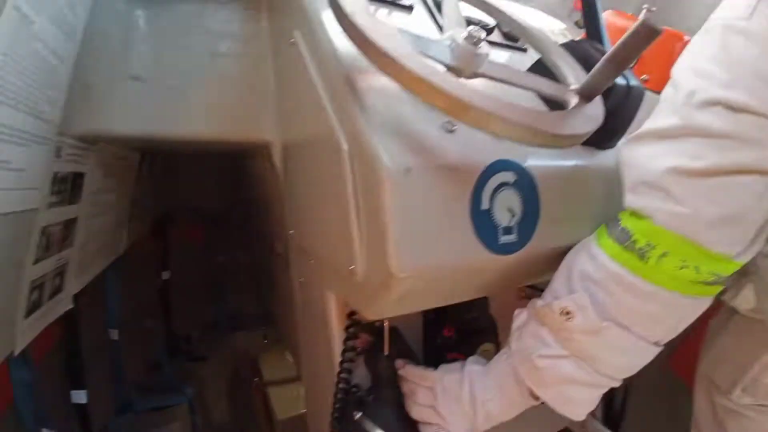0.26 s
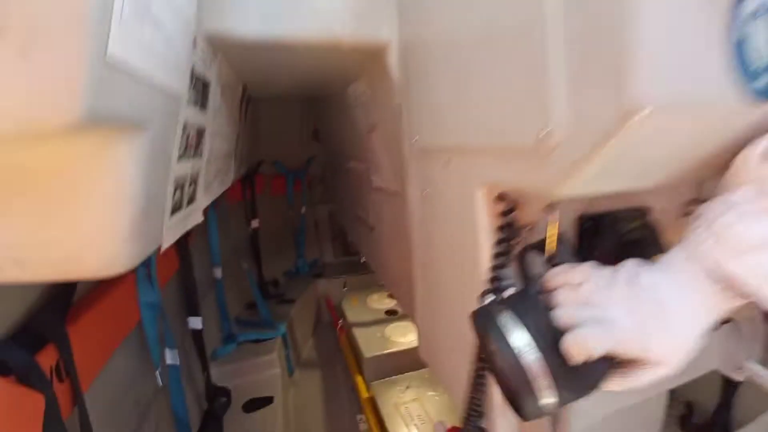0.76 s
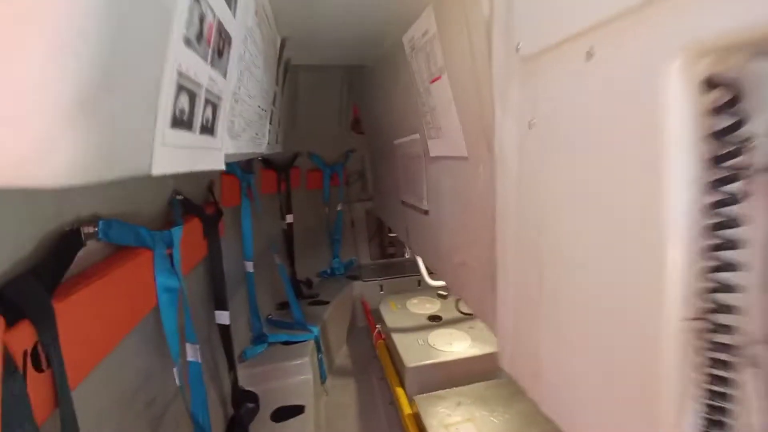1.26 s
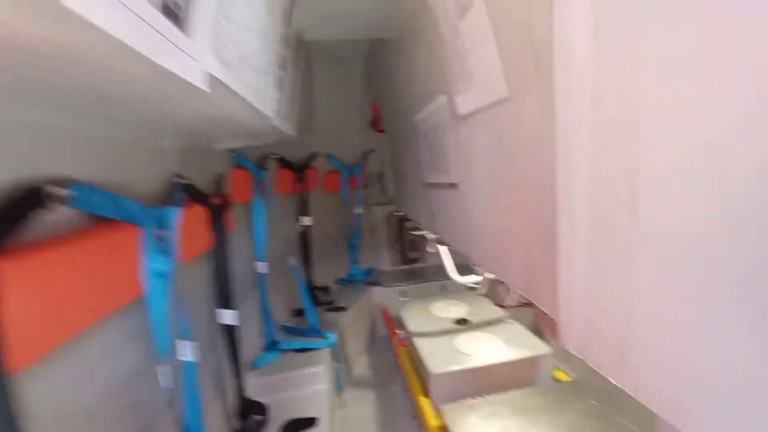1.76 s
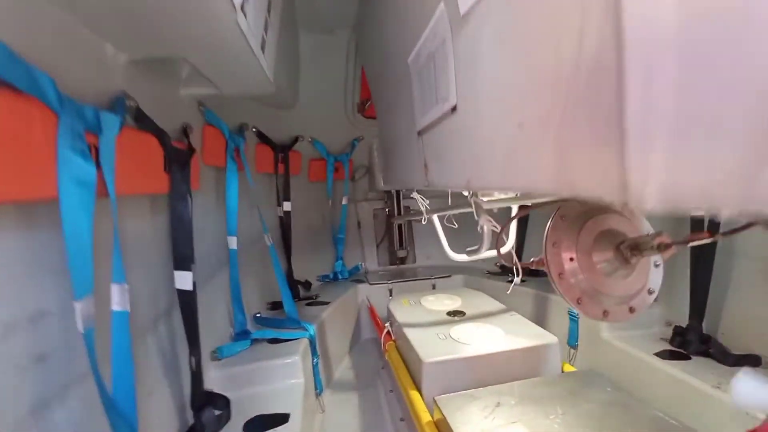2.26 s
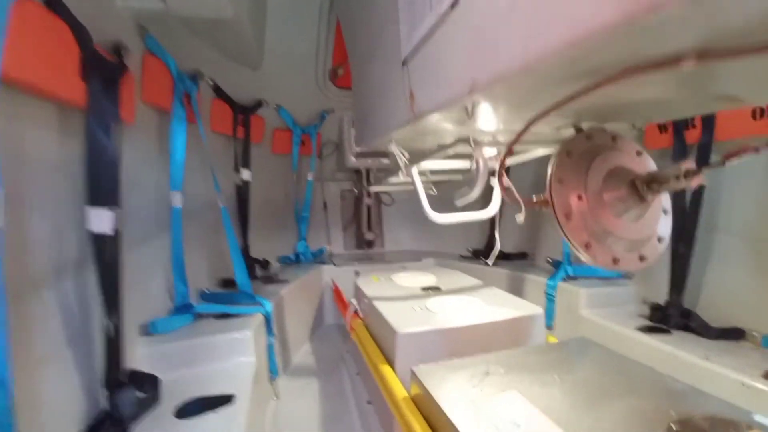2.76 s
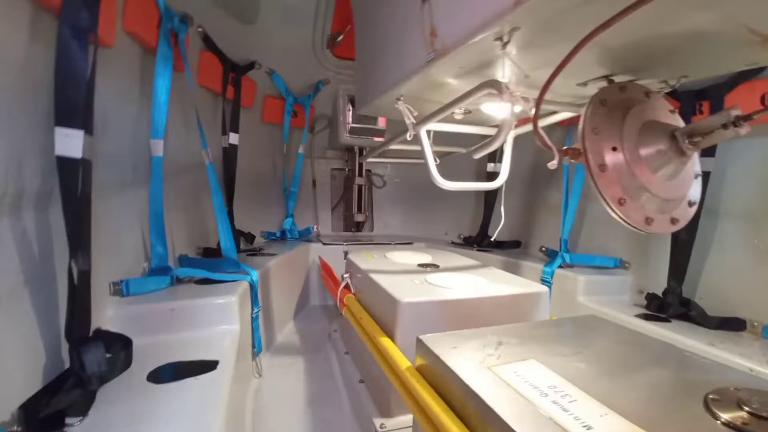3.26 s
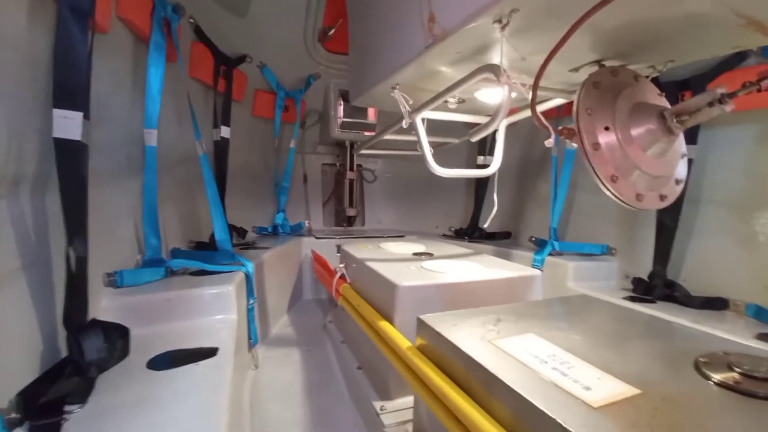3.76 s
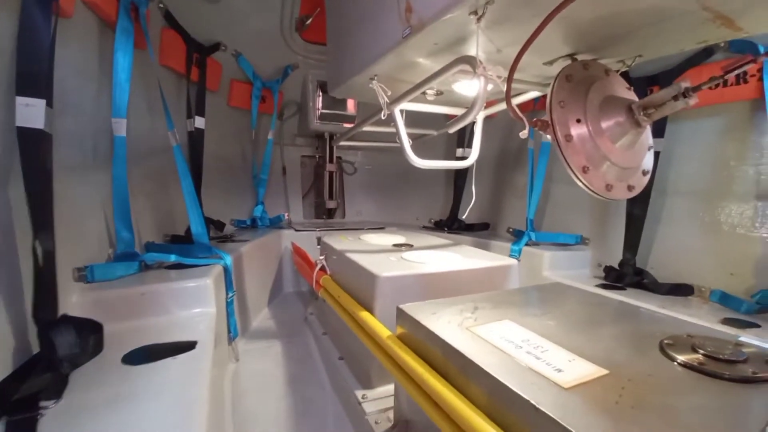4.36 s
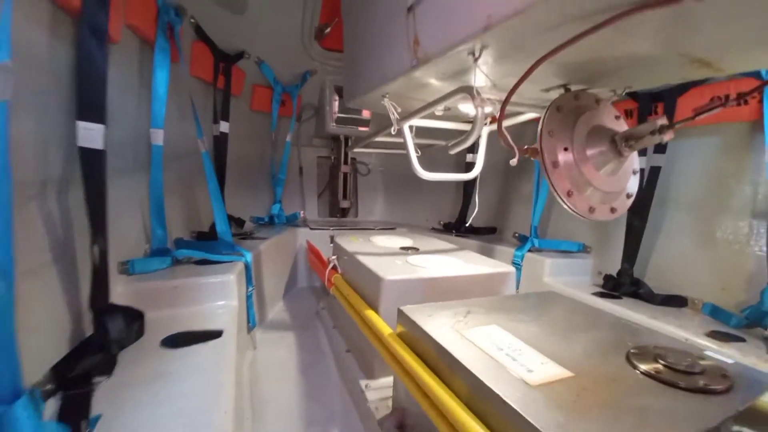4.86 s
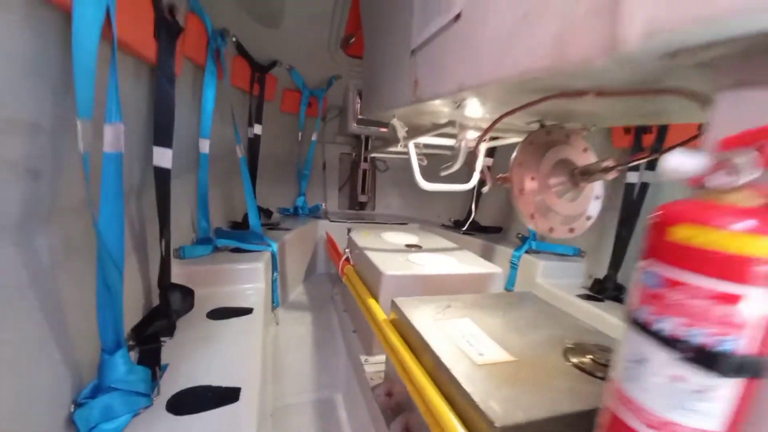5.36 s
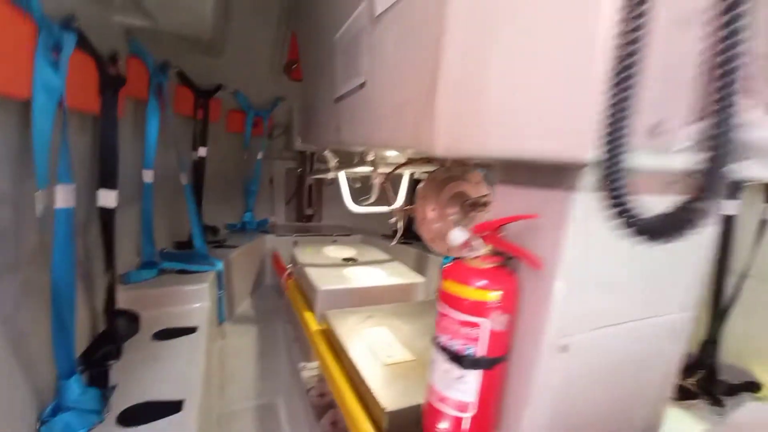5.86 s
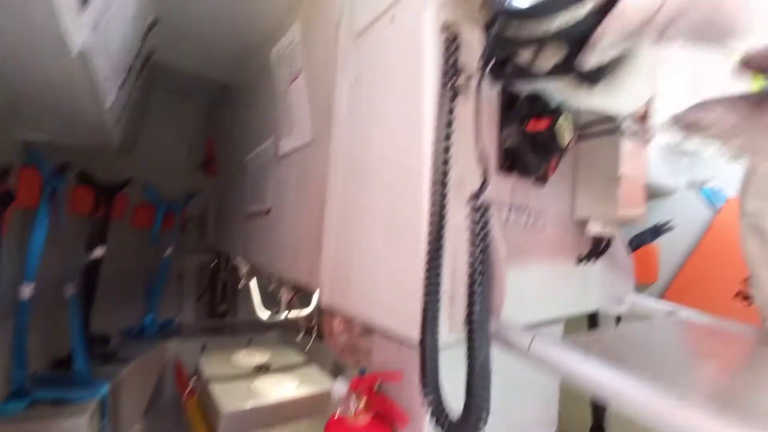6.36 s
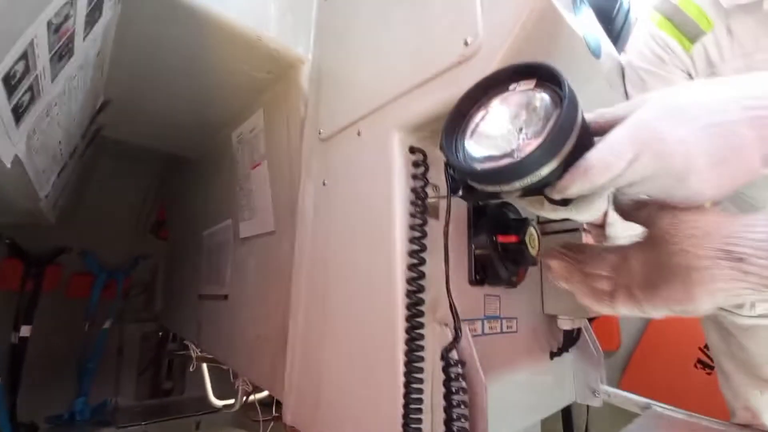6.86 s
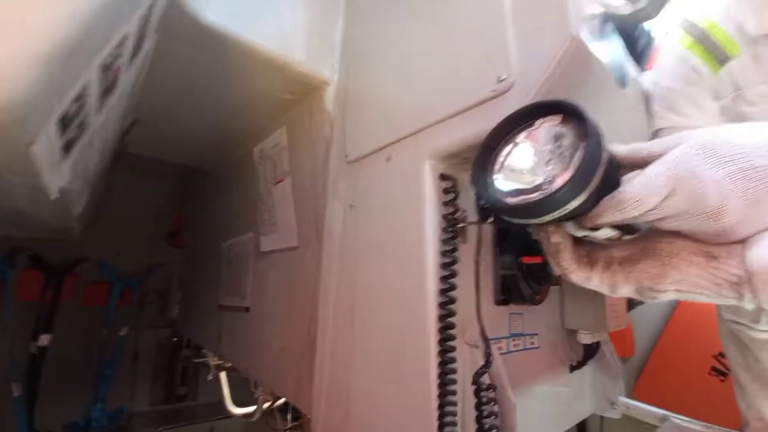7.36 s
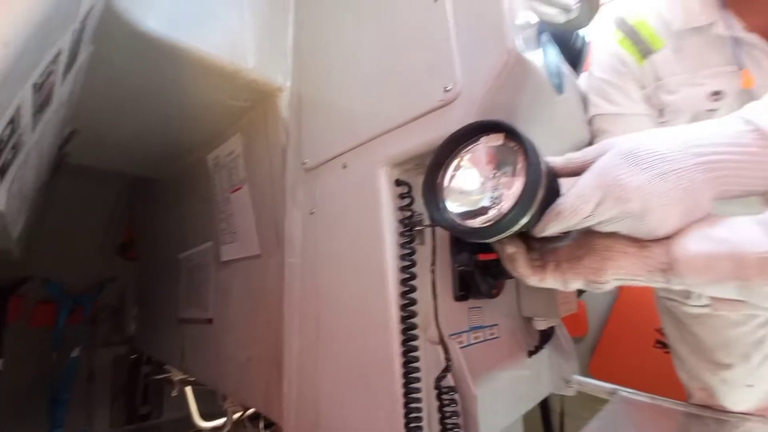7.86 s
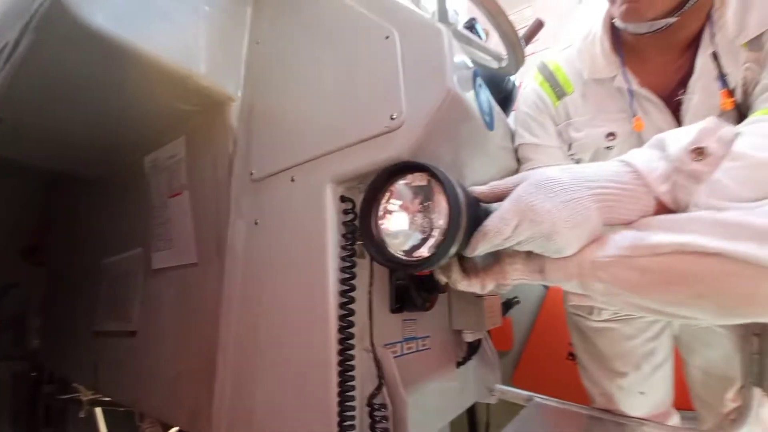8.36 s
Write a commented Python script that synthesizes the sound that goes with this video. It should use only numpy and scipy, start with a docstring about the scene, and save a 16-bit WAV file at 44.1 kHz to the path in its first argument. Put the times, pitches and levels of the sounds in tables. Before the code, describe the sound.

A diesel engine drones steadily inside a closed lifeboat, booming and clattering softly, its hum swelling and thinning as the microphone moves, with one dull bump.

```python
"""Diesel under a lifeboat canopy

A three-cylinder diesel runs steadily at about 1600 rpm inside a closed fibreglass lifeboat.
Firing harmonics drone in standing waves whose crests and nodes pass as the microphone is carried about.
Pulsed, coloured noise makes the canopy's boom, the pistons' knock through the panels and the valve clatter.
Noise bursts and short sines are the ticks and squeaks of a handled searchlight; a dull bump hits a panel."""
import sys
import numpy as np
from scipy import signal
from scipy.fft import rfft, irfft, next_fast_len
from scipy.io import wavfile

SR = 44100
rng = np.random.default_rng(int(sys.argv[2]) if len(sys.argv) > 2 else 0)


def unload_wav(signal):
    """Save mono or channel-first audio to the path in sys.argv[1] as 16-bit WAV at rate SR, clipped to [-1, 1]."""
    wavfile.write(
        sys.argv[1],
        SR,
        np.round(np.clip(np.atleast_2d(signal).T, -1, 1) * 32767).astype(np.int16),
    )


N = 379260  # length in samples
CYLINDERS = 3


def from_db(db):
    """Decibels to gain."""
    return 10 ** (np.asarray(db) / 20)


def rms_one(x):
    """Scale to rms 1."""
    return x / np.sqrt(np.mean(x ** 2) + 1e-20)


def in_time(rows):
    """Read each column of a curve at every sample."""
    s, *columns = np.transpose(rows)
    return [np.interp(np.arange(N) / SR, s, column) for column in columns]


def drift(rate):
    """Slow random wander with rms 1: noise through two equal low-pass poles at rate Hz."""
    step = 40  # the wander is made at a lower sample rate, then interpolated
    pole = np.exp(-2 * np.pi * rate * step / SR)
    noise = rng.standard_normal(N // step + 2002)
    slow = signal.lfilter([1], [1, -2 * pole, pole * pole], noise)[2000:]  # skip the filter's start
    return np.interp(np.arange(N) / step, np.arange(len(slow)), rms_one(slow))


def shaped(x, spectrum):
    """Filter with this spectrum, falling away beyond its ends."""
    hz, db = np.transpose(spectrum)
    size = next_fast_len(N + SR // 4)
    f = np.maximum(np.arange(size // 2 + 1) * SR / size, 1)
    skirts = np.minimum(f / hz[0], 1) ** 2 * np.minimum(hz[-1] / f, 1) ** 2
    gain = from_db(np.interp(np.log(f), np.log(hz), db)) * skirts
    return irfft(rfft(x, size) * gain, size)[:N]


def coloured(x, spectrum):
    """An excitation heard through a body with this spectrum; rms 1."""
    return rms_one(shaped(x, spectrum))


def line(turns, waver_db, waver_rate):
    """A tone that follows a turning part and wavers in level; rms 1."""
    tone = np.sin(2 * np.pi * (turns + rng.random()))
    return rms_one(tone * from_db(waver_db * drift(waver_rate)))


def strokes(cycle, count, decay, scatter_db):
    """Envelope of count blows per cycle, each with its own force, decaying over a share of the gap; rms 1."""
    place = cycle * count
    blow = np.floor(place - np.floor(place[0])).astype(int)
    force = from_db(scatter_db * rng.standard_normal(N // 20))
    return rms_one(force[blow] * np.exp(-(place % 1) / decay))


def walls(x, echo_gain, sway_s, count):
    """Near walls echo within milliseconds; the delays drift, so the ripple in the spectrum shifts."""
    n = np.arange(N)
    lags = [SR * (rng.uniform(0.002093, .014) + sway_s * drift(.2)) for _ in range(count)]
    return x + echo_gain * sum(x[np.round(n - lag).astype(int) % N] for lag in lags)


NODE_DB = -14.5  # what is left of a wave at its node


def standing_wave(along, across, node_m, spacing_m, slant):
    """Level in dB of a standing wave at the microphone: about 0 on a crest, NODE_DB at a node."""
    swing = np.sin(np.pi * (along - node_m - slant * across) / spacing_m)
    return 10 * np.log10(swing ** 2 + from_db(NODE_DB) ** 2)


# Each firing harmonic stands in the cabin as a wave; slant moves its node with the place across.
# columns: firing_multiple, crest_level_db, node_m, node_spacing_m, slant_m_per_m
STANDING_WAVES = [(2, -12, -0.09, 1.776, -1.49), (3, -15, -0.213, 1.703, 0.22),
                  (4, -19.5, 0.925, 1.35, -0.062), (5, -20, 0.62, 2.15, -.59), (6, -28.5, 0.925, 2.1, .62),
                  (7, -32.5, 0.31, 1.3, 0.19)]
# The strongest lines from the unequal cylinders.
# columns: multiple of the four-stroke cycle rate, level_db
UNEVEN = [(3, -46), (4, -47.5), (7, -41), (10, -32), (11, -37.5), (14, -31.5), (16, -34), (17, -37),
          (19, -33), (20, -47), (22, -46.5), (24, -38)]


def drone(cycle, along, across, shared_swell):
    """Firing harmonics, the low ones steadiest, with the weaker cycle lines between them."""
    firing = CYLINDERS * cycle
    levels = {}
    for k, db, *wave in STANDING_WAVES:
        levels[round(k)] = db + standing_wave(along, across, *wave)
    out = 0
    for k, db in levels.items():
        out = out + from_db(db) * line(k * firing, waver_db=0.14 * k, waver_rate=4.9)
    for k, db in UNEVEN:
        # close frequencies share a standing wave, so a weak line swells with the nearest firing harmonic
        nearest = levels.get(round(k / CYLINDERS))
        swell_db = 3.0 * drift(0.58) if nearest is None else shared_swell * nearest
        tone = line(round(k) * cycle, waver_db=4.2, waver_rate=1.9)
        out = out + from_db(db) * rms_one(from_db(swell_db) * tone)
    return out


COMB_FIRST, COMB_END = 25, 62  # multiples of the cycle rate; the end is left out
COMB_DB, COMB_DB_PER_OCTAVE = -46, -8  # level of the first line, and the fall above it
COMB_FIRING_DB = 4.5  # how far the firing harmonics stand out


def comb(cycle):
    """High cycle lines fall away with pitch; their short waves swell and fade by chance."""
    out = 0
    for k in range(COMB_FIRST, COMB_END):
        db = COMB_DB + COMB_DB_PER_OCTAVE * np.log2(k / COMB_FIRST)
        db += COMB_FIRING_DB * (k % CYLINDERS == 0)
        out = out + from_db(db) * line(k * cycle, waver_db=3.5, waver_rate=1.55)
    return out


# The helm console buzzes on a few cycle lines.
# columns: multiple of the cycle rate, level_at_helm_db
CONSOLE = [(25, -37.5), (39, -40.5), (43, -40.5), (56, -42.5), (61, -50)]
CONSOLE_DB_PER_M = -20


def console(cycle, along):
    """The console's panel buzzes in step with the engine and is soon left behind."""
    buzz = sum(from_db(db) * line(round(k) * cycle, waver_db=3, waver_rate=1.4) for k, db in CONSOLE)
    return from_db(CONSOLE_DB_PER_M * along) * buzz


# The shaft and the belt-driven parts hum at rates of their own.
# columns: pitch_hz, level_db
HUMS = [(20.8, -43.5), (87, -29.5), (175, -33), (2461, -59)]


def hums():
    """Slightly unsteady tones of the drive train."""
    t = np.arange(N) / SR
    out = 0
    for hz, db in HUMS:
        turns = hz * t + 0.35 * drift(1.0)
        out = out + from_db(db) * line(turns, waver_db=-3.9, waver_rate=0.74)
    return out


# Colour of the cabin's boom; only its shape counts.
# columns: frequency_hz, relative_density_db_per_hz
BOOM = [(15, -17), (45, -26), (65, 0.5), (88, -7), (105, -1.5), (128, 7.5), (150, 4.5), (178, 2), (200, 3),
        (240, -59)]


def boom(cycle):
    """Irregular combustion shakes the canopy and the air inside it."""
    shake = rng.standard_normal(N) * strokes(cycle, count=3, decay=1.3, scatter_db=2)
    return coloured(shake, BOOM)


# Colours of the knock in the canopy, the hull, the floor's engine hatch and the engine cover.
# columns of all four: frequency_hz, relative_density_db_per_hz
CANOPY = [(165, -28), (200, 1.5), (250, -6.5), (275, 4.5), (300, -7.5), (350, -26)]
HULL = [(260, -33), (315, 2.5), (345, -2), (368, 1), (390, -6.5), (430, -10), (505, -6), (600, -16)]
HATCH = [(400, -24), (440, 6.5), (490, -2), (545, -4.5), (590, -33)]
COVER = [(450, -40), (525, 3.5), (640, 9), (730, 1), (790, 1.5), (880, 3), (980, -5), (1200, -35)]


def knock(cycle, body):
    """Pistons slap at every dead centre and rattle a panel; long decays blur the blows together."""
    slaps = strokes(cycle, count=6, decay=1.8, scatter_db=0.7)
    return coloured(rng.standard_normal(N) * slaps, body)


# Colour of small hard contacts heard across the cabin, shared by the valve gear and the loose ticks.
# columns: frequency_hz, relative_density_db_per_hz
CLATTER = [(700, -16), (980, 2.5), (1300, 1), (1900, -2.5), (2600, -3), (3200, -9.5), (4100, -10.5),
           (5500, -15.5), (10000, -21), (15000, -28.5)]


def clatter(cycle, throb_db, grain_db, tap_share):
    """Injectors and tappets tap over a wash of echoes; one louder cylinder makes it throb once a cycle."""
    throb = from_db(throb_db * np.cos(2 * np.pi * cycle))
    taps = strokes(cycle, count=6, decay=0.56, scatter_db=3.0)
    taps = taps + strokes(cycle, count=3, decay=0.28, scatter_db=5.0)
    grain = from_db(grain_db * drift(12.3))
    force = throb * (1 + tap_share * taps) * grain
    wash = walls(rng.standard_normal(N) * force, echo_gain=0.076, sway_s=.00015, count=4)
    return coloured(wash, CLATTER)


# Ticks of loose gear; the level is that of the noise before filtering.
# columns: start_s, level_db, decay_t60_s, lowest_hz
TICKS = [(1.7107, -16, .05, 500), (2.273, -23, .03, 1200), (2.301, -10, .025, 11000),
         (3.845, -21, .04, 12000), (4.345, -20, .02, 800), (6.585, -22, .025, 6000)]
# Faint squeaks as the searchlight and its coiled cord are handled.
# columns: centre_s, pitch_hz, level_db, half_length_s
SQUEAKS = [(1.203, 6520, -51, .014), (1.207, 11100, -56, .01), (1.277, 5700, -52, .016),
           (1.30, 4520, -54, .04), (1.358, 4600, -51, .02), (1.94, 5200, -57, .03)]


def loose_gear():
    """Dry ticks of decaying noise in the clatter's colour, and short thin squeaks."""
    t, ticks = np.arange(N) / SR, np.zeros(N)
    for s, db, t60, low_hz in TICKS:
        age = np.clip((t - s) / t60, 0, 2)
        burst = rng.standard_normal(N) * (t >= s) * from_db(db - 60 * age)
        high_pass = signal.butter(2, low_hz, "high", fs=SR, output="sos")
        ticks += signal.sosfilt(high_pass, burst)
    out = shaped(ticks, CLATTER)
    for s, hz, db, length in SQUEAKS:
        swell = np.exp(-np.minimum(((t - s) / length) ** 2, 20))
        turns = hz * t + 0.24 * drift(25)
        out += from_db(db) * swell * np.sqrt(2) * np.sin(2 * np.pi * turns)
    return out


BUMP_S, BUMP_DB, BUMP_T60_S = 1.711, -8, .05  # start, level before colouring, decay


def bump():
    """Something bumps the console: a short dull knock in the engine cover's colour."""
    t = np.arange(N) / SR
    age = np.clip((t - BUMP_S) / BUMP_T60_S, 0, 2)
    burst = rng.standard_normal(N) * (t >= BUMP_S) * from_db(BUMP_DB - 60 * age)
    return shaped(burst, COVER)


# Engine speed.
# columns: time_s, firings_per_s
SPEED = [(0.0, 40.34), (0.6, 40.36), (1.2, 40.46), (2.0, 40.29), (2.8, 40.26), (4.2, 40.27), (4.8, 40.08),
         (5.6, 40.22), (6.5, 40.16), (7.2, 40.08), (7.9, 40.06), (8.6, 40.3)]
# The microphone is carried from the helm into the cabin and back along the other side.
# columns: time_s, along_m, across_m
PATH = [(0, 0.15, 0.097), (.45, 0.081, 0.055), (1.05, 0.37, -0.052), (2, 0.6, 0.0085), (3, 0.92, -0.28),
        (3.8, 0.84, 0), (5, 0.99, 0.052), (5.7, 0.84, 0.22), (6.3, 0.78, 0.33), (7, 0.44, 0.5),
        (7.7, 0.36, 0.61), (8.6, 0.47, 0.48)]
# Levels of the engine cover's knock and of the clatter at the microphone.
# columns: time_s, cover_level_db, clatter_level_db
EXPOSURE_DB = [(0, -37, -37), (.6, -35, -37), (1.1, -36, -37.3), (2.5, -40.5, -38), (3, -35, -38),
               (4.9, -35.5, -37), (5.35, -37.5, -40), (6.1, -36.5, -37), (6.55, -36, -38.5),
               (7.15, -35.5, -37), (7.8, -38, -38), (8.6, -36.5, -37.7)]
# Levels at the helm (0 m along, 0 m across) and their change with place.
BOOM_DB, BOOM_DB_PER_M = -22, -2
CANOPY_DB, CANOPY_DB_PER_M_ALONG, CANOPY_DB_PER_M_ACROSS = -26, -10, 5
HATCH_DB, HATCH_DB_PER_M_ALONG, HATCH_DB_PER_M_ACROSS = -48, 12.5, 0.5
# The hull's knock swells and fades with the clatter, and weakens along the cabin.
HULL_OVER_CLATTER_DB, HULL_DB_PER_M = 6, -1.5


def scene():
    """One crankshaft drives the engine layers; place and exposure set their balance."""
    firing_hz, = in_time(SPEED)
    cycle = np.cumsum(firing_hz) / SR / CYLINDERS + .91  # four-stroke cycles turned so far
    along, across = in_time(PATH)
    cover_db, clatter_db = in_time(EXPOSURE_DB)
    boom_db = BOOM_DB + BOOM_DB_PER_M * along
    canopy_db = CANOPY_DB + CANOPY_DB_PER_M_ALONG * along + CANOPY_DB_PER_M_ACROSS * across
    hatch_db = HATCH_DB + HATCH_DB_PER_M_ALONG * along + HATCH_DB_PER_M_ACROSS * across
    hull_db = clatter_db + HULL_OVER_CLATTER_DB + HULL_DB_PER_M * along
    tones = drone(cycle, along, across, shared_swell=0.79) + comb(cycle) + console(cycle, along) + hums()
    panels = (from_db(boom_db) * boom(cycle)
              + from_db(canopy_db) * knock(cycle, CANOPY)
              + from_db(hull_db) * knock(cycle, HULL)
              + from_db(hatch_db) * knock(cycle, HATCH)
              + from_db(cover_db) * knock(cycle, COVER))
    top = from_db(clatter_db) * clatter(cycle, throb_db=0.72, grain_db=0.82, tap_share=0.09)
    return (tones + panels + top + loose_gear() + bump())[None]


# The microphone's port has peaks and notches in the treble.
# columns: frequency_hz, gain_db
PORT = [(10, -0.5), (5500, 0), (6550, 2), (7300, -3.5), (8100, -6.5), (9000, -3), (10200, -1),
        (11600, -4.5), (12500, -8), (13700, -16), (14600, 1), (16000, -1)]
CUTOFF_HZ, FADE_S = 15750, .006


def record(dry):
    """The microphone's port colours the treble, and the top is cut steeply; both ends are eased."""
    t = np.arange(N) / SR
    to_nearest_end = np.minimum(t, t[::-1])
    fade = np.sin(np.pi / 2 * np.minimum(to_nearest_end / FADE_S, 1)) ** 2
    # order 12, 0.1 dB ripple, 90 dB down above the cut
    low_pass = signal.ellip(12, .1, 90, CUTOFF_HZ, fs=SR, output="sos")
    return signal.sosfilt(low_pass, shaped(dry[0] * fade, PORT))[None]


dry = scene()
out = record(dry)
unload_wav(out)
```